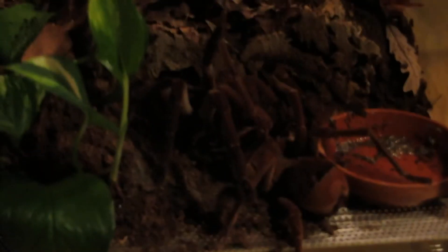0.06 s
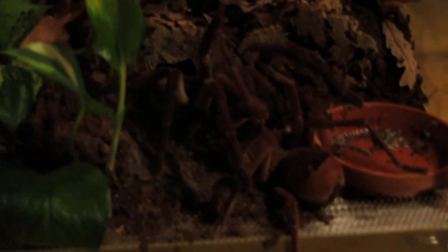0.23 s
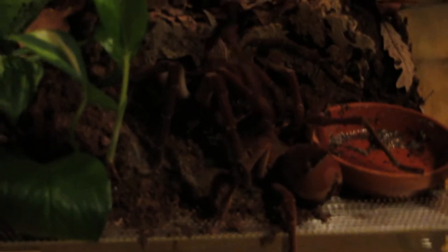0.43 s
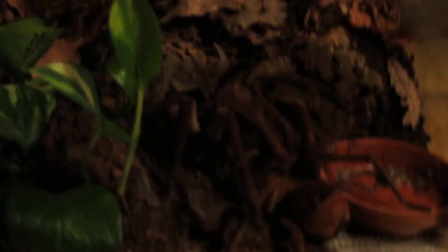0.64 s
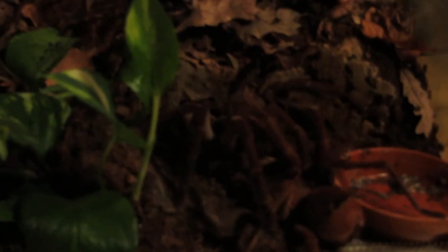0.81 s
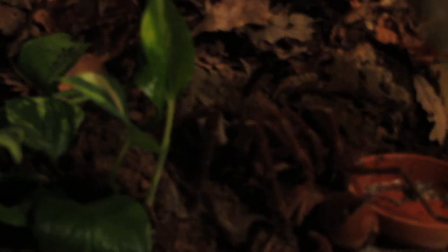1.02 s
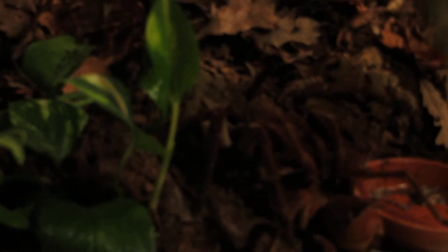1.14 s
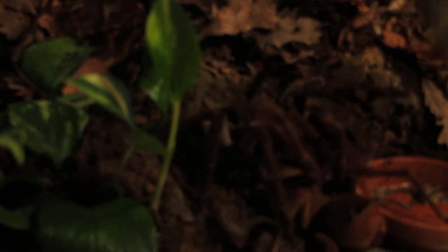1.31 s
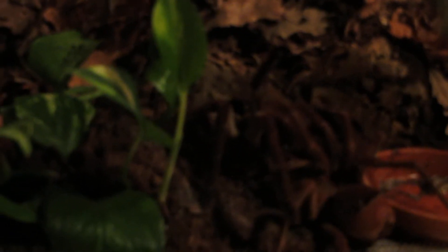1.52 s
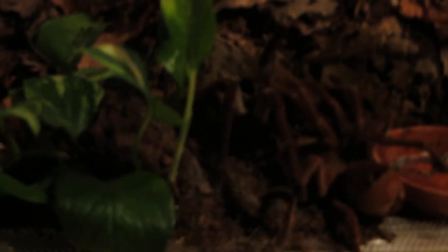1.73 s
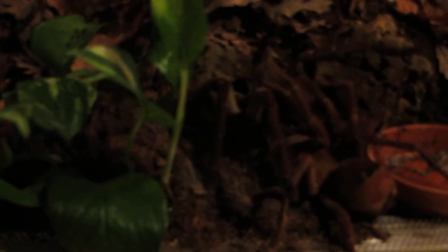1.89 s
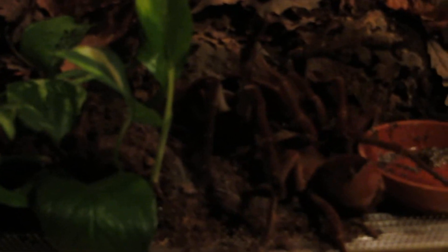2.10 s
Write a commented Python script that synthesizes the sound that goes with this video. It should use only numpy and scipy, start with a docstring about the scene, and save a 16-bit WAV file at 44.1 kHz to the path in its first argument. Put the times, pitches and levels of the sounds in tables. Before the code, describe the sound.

Hollow knocks and sharp clicks come from a terrarium being handled, in two short clatters. One more click and a few soft bumps follow, almost straight ahead in a small, slightly echoing room with faint hiss.

```python
"""A small, live room with a terrarium, where something hard is handled. Contacts thump the enclosure and
ring its modes: two short clatters of hollow knocks, then a few soft bumps. A small hard object gives
seven sharp clicks and a few faint ones, all with the same bright ring. Underneath: quiet room noise,
a weak low hum, a thin whine, a faint hiss that swells and fades, and one brief low rumble."""
import sys
import numpy as np
from scipy import signal
from scipy.fft import rfft, irfft, next_fast_len
from scipy.io import wavfile

SR = 44100
rng = np.random.default_rng(int(sys.argv[2]) if len(sys.argv) > 2 else 0)


def dump(signal):
    """Clip the signal to [-1, 1] and save it as 16-bit WAV at the path in sys.argv[1]."""
    limited = np.clip(np.atleast_2d(signal).T, -1, 1)
    pcm = np.round(limited * 32767).astype(np.int16)
    wavfile.write(sys.argv[1], SR, pcm)


N = 94815
BLOW_T = np.arange(SR // 2) / SR
SCENE_T = np.arange(N) / SR


def amp(db):
    """Decibels to gain."""
    return 10 ** (np.asarray(db) / 20)


def unit(x):
    """Scale to rms 1."""
    return x / np.sqrt(np.mean(x ** 2) + 1e-20)


def along(points, hz):
    """Interpolate (freq_hz, value) points on a log axis."""
    freq_hz, values = np.transpose(points)
    return np.interp(np.log(hz + 1), np.log(freq_hz + 1), values)


def fade(t, t60_s):
    """Exponential decay."""
    return np.exp(-np.log(1000) * t / t60_s)


def filtered(x, response):
    """Apply a frequency response."""
    size = next_fast_len(x.shape[-1] + SR // 4)
    return irfft(rfft(x, size) * response(np.fft.rfftfreq(size, 1 / SR)), size)[..., :x.shape[-1]]


def white(size):
    """Two independent white noises."""
    return rng.standard_normal((2, size))


def noise(colour_db, correlation, source):
    """Stereo noise of given spectrum and left-right correlation, rms 1."""
    def response(hz):
        angle = np.arccos(np.clip(along(correlation, hz), -1, 1)) / 2
        return amp(colour_db(hz)) * [np.cos(angle), np.sin(angle)]
    mid, side = filtered(source, response)
    return unit(np.array([mid + side, mid - side]))


def add(track, start_s, sound):
    """Mix a sound in at start_s."""
    part = track[:, round(start_s * SR):][:, :sound.shape[-1]]
    part += sound[..., :part.shape[-1]]


# Room noise spectrum: freq_hz, density_db
ROOM_NOISE_COLOUR = [(15, -32), (25, -4.5), (108, -10.5), (166, -7.5), (236, -5), (326, -6), (489, -4.5),
                     (591, -6.5), (754, -6), (818, -1.5), (988, -6.5), (2410, -11.5), (2760, -12),
                     (4140, -16.5), (12900, -29), (14800, -24), (16000, -43)]
# Room noise, left against right: freq_hz, correlation
ROOM_NOISE_CORRELATION = [(40, -0.82), (110, -0.86), (300, -0.95), (1000, -0.84), (2400, -0.9),
                          (4400, -0.59), (8000, -0.41), (14000, -0.35)]

def room_noise(level_db=-46.5):
    """Steady, wide noise, largely in antiphase."""
    return amp(level_db) * noise(lambda hz: along(ROOM_NOISE_COLOUR, hz), ROOM_NOISE_CORRELATION, white(N))


# Hiss spectrum: freq_hz, density_db
HISS_COLOUR = [(590, -26), (1000, -5.5), (1180, -5.5), (1730, -8.5), (6630, -13), (11800, -21.5),
               (14600, -30), (16000, -59)]
# Hiss envelope: time_s, level_db
HISS_ENVELOPE = [(0, -50.5), (.15, -51.5), (.55, -55.5), (1.099, -56), (1.5, -62), (1.72, -53.5),
                 (1.9, -55), (2.0, -54), (2.08, -50.5), (2.15, -51)]
# Hiss, hum and rumble, left against right: freq_hz, correlation
DIFFUSE_CORRELATION = [(1000, -0.05), (4000, 0.14), (14000, 0.052)]

def hiss():
    """Faint hiss that fades and swells again."""
    level_db = np.interp(SCENE_T, *np.transpose(HISS_ENVELOPE))
    return amp(level_db) * noise(lambda hz: along(HISS_COLOUR, hz), DIFFUSE_CORRELATION, white(N))


# Low hum: pitch_hz, width_hz, level_db
HUM_BANDS = [(115.6, 7.1, -70)]

def hum():
    """Weak low hum as a narrow noise band."""
    out = np.zeros((2, N))
    for pitch_hz, width_hz, level_db in HUM_BANDS:
        band_db = lambda hz: -20 * np.log10(1 + (2 * (hz - pitch_hz) / width_hz) ** 2)
        out += amp(level_db) * noise(band_db, DIFFUSE_CORRELATION, white(N))
    return out


def whine(pitch_hz=14652, pulse_hz=100, level_db=-72):
    """Thin, mains-pulsed tone."""
    since_pulse_s = SCENE_T % (1 / pulse_hz)
    pulses = unit(since_pulse_s * fade(since_pulse_s, t60_s=0.006))
    return amp(level_db) * np.sin(2 * np.pi * pitch_hz * SCENE_T) * pulses


# Direct sound, left against right: freq_hz, correlation
DIRECT_CORRELATION = [(200, 0.81), (2500, 0.97), (8000, 0.67), (14000, 0)]
# Room tail, left against right: freq_hz, correlation
TAIL_CORRELATION = [(200, 0.69), (2500, 0.94), (8000, 0.92), (14000, .1)]
# Room decay before tail_scale: freq_hz, t60_s
TAIL_DECAY = [(200, 0.26), (1000, 0.35), (3000, 0.36), (8000, 0.32), (14000, 0.24)]

def blow(colour_db, body, body_share, rise_s, t60_s, tail_db, tail_scale=1.0, tail_rise_s=0.0048):
    """Dense, fast-dying ring plus room tail; body is the part that repeats at every blow."""
    size = len(BLOW_T)
    grain = np.sqrt(body_share) * body + np.sqrt(1 - body_share) * white(size)
    envelope = (1 - np.exp(-BLOW_T / rise_s)) * fade(BLOW_T, t60_s)
    direct = noise(colour_db, DIRECT_CORRELATION, grain) * envelope
    hz, t, spectra = signal.stft(noise(colour_db, TAIL_CORRELATION, white(size)), SR, nperseg=256)
    spectra *= fade(t, tail_scale * along(TAIL_DECAY, hz)[:, None])
    tail = signal.istft(spectra, SR, nperseg=256)[1][:, :size]
    return direct + amp(tail_db) * tail * (1 - np.exp(-BLOW_T / tail_rise_s))


def ring(mode_hz, mode_db, t60_s, rise_s=0.002, scatter_db=1.5):
    """Decaying modes; strength and phase vary per blow."""
    gains = amp(mode_db + rng.normal(0, scatter_db, len(mode_hz)))
    waves = np.sin(2 * np.pi * (mode_hz[:, None] * BLOW_T + rng.random((len(mode_hz), 1))))
    return gains @ waves * fade(BLOW_T, t60_s) * (1 - np.exp(-BLOW_T / rise_s))


# Contacts on the enclosure: start_s, level_db, thin_below_hz, dull_above_hz
KNOCK_HITS = [(.111, -41.5, 40, 340), (0.1228, -39.5, 100, 382), (.187, -40, 500, 2000),
              (0.2064, -32.5, 400, 2200), (.217, -36.5, 300, 1190), (.284, -29.5, 250, 1090),
              (0.2919, -32, 250, 980), (0.3012, -28, 250, 1040), (0.3112, -35.5, 250, 1030),
              (0.321, -30.5, 199, 895), (0.365, -34, 397, 1520), (0.3739, -33, 398, 2200),
              (.38, -28.5, 450, 2580), (.388, -27.5, 444, 2400), (.403, -33.5, 446, 2400),
              (.419, -41.5, 450, 2000), (0.7016, -25, 90, 1950), (.722, -24.5, 90, 2400),
              (0.7379, -26, 90, 2600), (0.7488, -38.5, 90, 2010), (0.7621, -20.5, 90, 2160),
              (0.7831, -25, 90, 1990), (.808, -30.5, 150, 2030), (.8135, -31.5, 250, 2400),
              (.833, -33, 300, 2400), (1.259, -44.5, 380, 800), (1.266, -47, 350, 570),
              (1.385, -49.5, 400, 1035), (1.523, -48.5, 403, 1200), (1.705, -46.5, 696, 3030),
              (1.793, -45.5, 497, 2500), (1.888, -48.5, 30, 90), (1.93, -51.5, 696, 2430)]
# Thump spectrum: freq_hz, density_db
THUMP_COLOUR = [(50, -43), (115, -9), (230, -1.5), (420, -2), (680, 2.5), (1050, 5.5), (1550, 1.5),
                (2000, 4), (2700, 0.5), (5000, 0), (12000, 5)]
# Enclosure modes: pitch_hz, gain_db
ENCLOSURE_MODES = [(118, -8.5), (221, -3.5), (270, -4.5), (339, -2), (559, -1), (676, 2), (722, -4.5),
                   (817, -0.5), (962, -2.5), (998, 2), (1112, 2.5), (1215, -13), (1303, -1), (1822, 2),
                   (2126, 4)]

def knocks(ring_db=-18.5):
    """Each contact thumps the enclosure and rings its modes; light ones thinner, soft ones duller."""
    out, body = np.zeros((2, N)), white(len(BLOW_T))
    mode_hz, mode_db = np.transpose(ENCLOSURE_MODES)
    for start_s, level_db, thin_hz, dull_hz in KNOCK_HITS:
        contact_db = lambda hz: -10 * np.log10(1 + (hz / dull_hz) ** 6 + (thin_hz / (hz + 1)) ** 4)
        colour_db = lambda hz: along(THUMP_COLOUR, hz) + contact_db(hz)
        thump = blow(colour_db, body, body_share=0.57, rise_s=0.0005, t60_s=0.038,
                     tail_db=-14, tail_scale=0.9)
        modes = ring(mode_hz, ring_db + mode_db + contact_db(mode_hz), t60_s=0.21)
        add(out, start_s, amp(level_db) * (thump + modes))
    return out


# Clicks of the object: start_s, level_db, tilt_db_per_octave
CLICK_HITS = [(.187, -42, -0.5), (0.205, -37, -1), (.216, -23, 1.5), (0.325, -26, 1), (.364, -26, 0),
              (0.6042, -22, 2), (0.626, -41, 12), (0.6892, -24.5, 2.5), (0.7636, -24.5, 1.5),
              (0.9715, -23.5, 0.5)]
# Snap spectrum: freq_hz, density_db
SNAP_COLOUR = [(180, -59), (300, -12), (392, -24), (486, -22), (713, -18), (787, -10), (930, -15),
               (1560, -7), (1690, -14.5), (1810, -7), (1930, -2.5), (2100, -5), (2650, -4), (2880, -1.5),
               (3350, -2), (3830, -7.5), (4520, -7.5), (5250, -9.5), (7320, -4), (8640, -7), (9550, -14.5),
               (12500, -18.5), (13500, -25), (15200, -32), (16000, -39)]
# Object modes: pitch_hz, gain_db
OBJECT_MODES = [(1850, -3), (2060, -1.5), (2326, -10), (2853, 1.5), (3214, -3), (3400, 0), (4750, -3.5),
                (7050, -3), (7330, -2), (8340, -1)]

def clicks(ring_db=-12):
    """One small hard object snaps and rings, brighter or duller per click."""
    out, body = np.zeros((2, N)), white(len(BLOW_T))
    mode_hz, mode_db = np.transpose(OBJECT_MODES)
    for start_s, level_db, tilt_db_per_octave in CLICK_HITS:
        colour_db = lambda hz: along(SNAP_COLOUR, hz) + tilt_db_per_octave * np.log2(hz + 1)
        snap = blow(colour_db, body, body_share=0.77, rise_s=0.00072, t60_s=0.044, tail_db=-8)
        modes = ring(mode_hz, ring_db + mode_db, t60_s=0.098)
        add(out, start_s, amp(level_db) * (snap + modes))
    return out


def rumble(peak_s=0.4, half_width_s=0.11, level_db=-59.5, cutoff_hz=74.4):
    """Brief low swell under the first clatter."""
    swell = amp(level_db) * np.exp(-((SCENE_T - peak_s) / half_width_s) ** 2)
    lowpass_db = lambda hz: -10 * np.log10(1 + (hz / cutoff_hz) ** 4)
    return swell * noise(lowpass_db, DIFFUSE_CORRELATION, white(N))


# Balance of clicks and knocks: freq_hz, left_minus_right_db
HANDLING_BALANCE = [(200, 4.1), (1200, -1.5), (2500, -0.5), (5000, 0), (12000, 4)]

def scene(right_lead_s=12e-6, background_left_db=0.33):
    """Handling almost straight ahead, over a wide background."""
    sides = np.array([[0.5], [-0.5]])
    balance = lambda hz: amp(sides * along(HANDLING_BALANCE, hz))
    delay = lambda hz: np.exp(-2j * np.pi * hz * sides * right_lead_s)
    handling = filtered(clicks() + knocks(), lambda hz: balance(hz) * delay(hz))
    background = room_noise() + hiss() + hum() + whine() + rumble()
    return handling + background * amp(sides * background_left_db)


def record(dry):
    """Brick-wall low-pass at 15.8 kHz."""
    return filtered(dry, lambda hz: hz < 15800)


dry = scene()
out = record(dry)
dump(out)
```